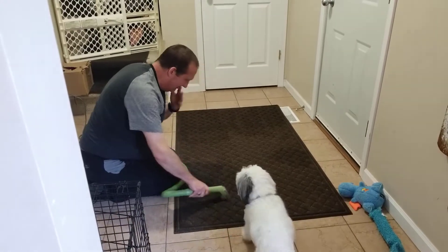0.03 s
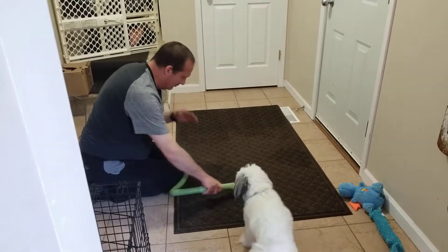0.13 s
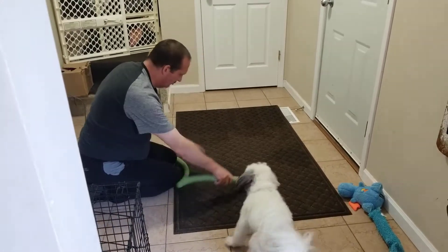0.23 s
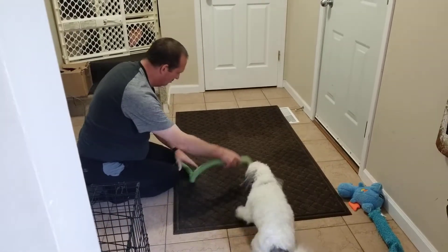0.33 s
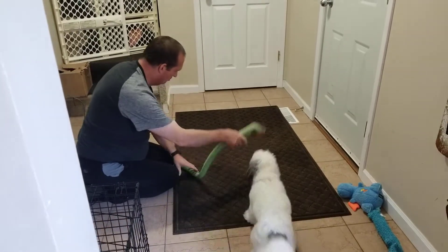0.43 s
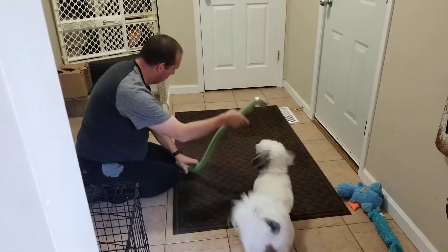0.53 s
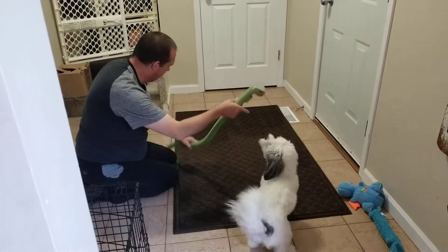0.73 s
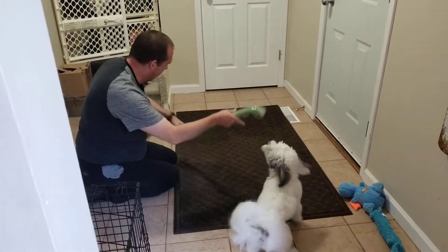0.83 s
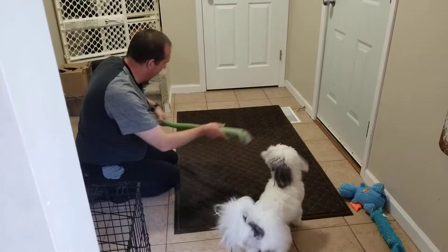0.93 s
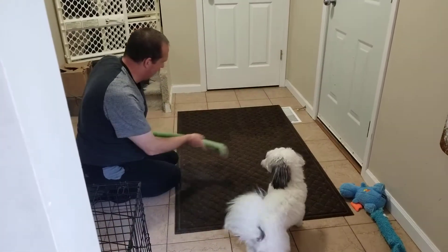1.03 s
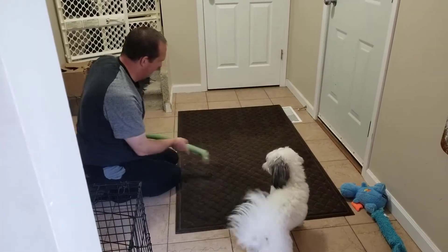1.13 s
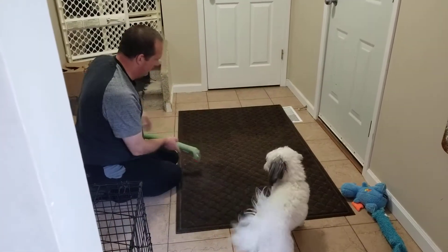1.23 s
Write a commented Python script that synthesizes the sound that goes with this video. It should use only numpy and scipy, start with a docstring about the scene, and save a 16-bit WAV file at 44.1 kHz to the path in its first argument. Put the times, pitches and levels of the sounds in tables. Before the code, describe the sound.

A small dog barks once, from about 0.2 to 0.35 seconds, a high rising yelp that breaks into a rasp and rings briefly in a hallway. Three very faint paw thuds land on a mat within the first 0.4 seconds. An appliance hums with softly rushing air throughout, dropping in level at the bark and staying quieter until the end, at around 1.3 seconds.

```python
"""A bark in a tiled hallway

An appliance's motor hums over rushing air, and paws thud softly on a mat. A small dog barks once:
its vocal folds slide up in a clear yelp, then break into a rasp, and walls and doors answer.
The recorder's gain control turns down at the bark and stays down, so the hum is quieter afterwards."""
import sys
import numpy as np
from scipy import signal
from scipy.fft import rfft, irfft, next_fast_len
from scipy.io import wavfile
from scipy.ndimage import uniform_filter1d, minimum_filter1d, map_coordinates

SR = 44100
rng = np.random.default_rng(int(sys.argv[2]) if len(sys.argv) > 2 else 0)


def bounce(signal):
    """Save signal as a 16-bit WAV file at the path given by the first command-line argument."""
    frames = np.transpose(np.atleast_2d(signal))
    limited = np.clip(frames, -1, 1)
    pcm = np.round(limited * 32767).astype(np.int16)
    wavfile.write(sys.argv[1], SR, pcm)


N = 57330
TIME = np.arange(N) / SR


def amp(db):
    """Turn decibels into a number to multiply by."""
    return 10 ** (np.asarray(db) / 20)


def unit(x):
    """Scale a sound to an average (rms) level of 1."""
    return x / np.sqrt(np.mean(x ** 2) + 1e-20)


def along(points, hz):
    """Read a table at any frequency, sliding between rows on a log scale."""
    freqs, values = np.transpose(points)
    return np.interp(np.log(hz + 1), np.log(freqs + 1), values)


def curves(rows):
    """Join timed rows with straight lines: one curve for each column after the time."""
    times, *columns = np.transpose(rows)
    return [np.interp(TIME, times, column) for column in columns]


def wobble(rate):
    """A smooth random curve through `rate` points a second."""
    return map_coordinates(rng.standard_normal(4096), [TIME * rate], mode="wrap")


def filtered(x, response):
    """Multiply each frequency in a sound by response(hz)."""
    size = next_fast_len(N + SR // 2)
    return irfft(rfft(x, size) * response(np.fft.rfftfreq(size, 1 / SR)), size)[..., :N]


def delayed(x, seconds):
    """The same sound, arriving later."""
    return filtered(x, lambda hz: np.exp(-2j * np.pi * hz * seconds))


def turning(hz):
    """The growing angle (phase) of a wave whose pitch follows hz."""
    return 2 * np.pi * np.cumsum(hz) / SR


# The motor's slight sag. Each row: time in seconds, pitch in Hz.
MOTOR_PITCH = [(0, 442.1), (.3, 435.3), (.75, 436.2), (1.3, 435.7)]
# The tones in the hum. Each row: multiple of the motor's pitch, level in dB.
HUM_TONES = [(.395, -53), (1, -32), (1.321, -39.5), (1.432, -44.5), (2, -46.5), (4.675, -43.5),
             (4.82, -47.5), (6.988, -53.5), (11.99, -60.5)]
# The tone color of the rushing air. Each row: frequency in Hz, relative level in dB.
AIR_COLOR = [(20, -34), (45, -17), (90, -22), (140, -13), (170, -10.5), (200, -9.5), (270, -14), (400, -12),
             (530, -8), (620, 1.5), (700, -5), (900, -10), (1500, -8), (1900, -6.5), (2060, -7),
             (2200, -11.5), (2550, -9), (2800, -17.5), (3300, -21), (4000, -21), (5700, -27), (8200, -41),
             (10000, -30.5), (12500, -31), (15700, -40)]
# The air's width. Each row: frequency in Hz, how alike left and right are (1 same, -1 opposite).
AIR_LIKENESS = [(50, 0.84), (170, 1), (400, 0.54), (700, 0.6), (1200, -0.11), (1600, -0.61), (2200, .35),
                (3200, -0.19), (8000, 0.0092)]

def appliance(waver_db=1.42, air_db=-28.5):
    """A motor hums, wavering a little, while air rushes through the appliance."""
    phase = turning(curves(MOTOR_PITCH)[0])
    hum = 0
    for ratio, db in HUM_TONES:
        strength = np.sqrt(2) * amp(db + waver_db * wobble(18))
        offset = rng.uniform(0, 2 * np.pi) + 0.21 * ratio * wobble(14)
        hum += strength * np.sin(ratio * phase + offset)

    def air_shape(hz):
        spread = np.arccos(np.clip(along(AIR_LIKENESS, hz), -1, 1)) / 2
        return amp(along(AIR_COLOR, hz)) * [np.cos(spread), np.sin(spread)]

    shared, opposite = filtered(rng.standard_normal((2, N)), air_shape)
    air = unit(np.array([shared + opposite, shared - opposite]))
    return hum + amp(air_db) * air


# Steps on the mat. Each row: start in seconds, relative level in dB.
PAW_STEPS = [(0.019, -41.5), (0.206, -40), (0.358, -40)]

def paws(pitch_hz=170.2, rise_s=0.0082, ring_s=0.065):
    """Each step gives the floor a short, dull ring."""
    floor = np.zeros(N)
    for start, db in PAW_STEPS:
        age = np.maximum(TIME - start, 0)
        strength = amp(db - 60 * age / ring_s) * (1 - np.exp(-age / rise_s))
        floor += strength * np.sin(2 * np.pi * pitch_hz * age)
    return 2 * floor


# The course of the bark. Each row: time in seconds, pitch in Hz, lowest tone's level in dB,
# overtones' level in dB before the throat shapes them, rasp's level in dB.
BARK_SHAPE = [(.204, 565.1, -54, -49.5, -48), (.213, 634.2, -31, -23.5, -43.5),
              (.223, 730.2, -15, -17, -26.5), (0.235, 763.2, -16, -12, -19), (.244, 837.2, -4, -14, -19.5),
              (0.26, 871.4, -9, -31, -13), (.274, 863.8, -10, 0, -8), (0.291, 843, -11, -5, -5),
              (0.314, 857.5, -18.5, -16, -6.5), (0.338, 851, -2, -25.5, -7.5), (0.351, 795, -62, -32, -27)]
# How throat and mouth shape the overtones. Each row: frequency in Hz, boost or cut in dB.
THROAT_COLOR = [(600, 2), (1150, 0.5), (1650, -2.5), (2000, -6.5), (2300, -11), (2600, -20.5), (2850, 1),
                (3050, -6), (3300, -28.5), (3900, -18), (4600, -60), (8000, -53)]
# The tone color of the rasp. Each row: frequency in Hz, relative level in dB.
RASP_COLOR = [(250, -54), (480, -32.5), (680, -8.5), (930, 0.5), (1120, -1), (1350, -12.5), (1550, -2.5),
              (1760, -0.5), (2020, -14), (2480, -7), (2950, -13.5), (3500, -29.5), (4500, -44), (6200, -39),
              (8200, -49), (11000, -44), (15500, -58)]

def bark(rough_start_s=0.255, roughen_s=0.027, shakes_per_s=500, second_hz=1121, close_db_per_s=1208):
    """Vocal folds glide up cleanly, then shake, add a second tone and chop the air into a rasp."""
    pitch, lowest_db, overtone_db, rasp_db = curves(BARK_SHAPE)
    roughness = np.clip((TIME - rough_start_s) / roughen_s, 0, 1)
    shake = (0.0098 + 0.042 * roughness) * wobble(shakes_per_s)
    phase = turning(pitch * (1 + shake))
    overtones = sum(amp(along(THROAT_COLOR, k * pitch)) * np.sin(k * phase) for k in range(2, 7))
    # Near 0.3 seconds the folds briefly vibrate at a second pitch too.
    swell = amp(-6.5) * np.exp(-0.5 * ((TIME - 0.3007) / 0.0086) ** 2)
    second_tone = swell * np.sin(turning(second_hz * (1 + 0.0371 * wobble(shakes_per_s))))
    voice = np.sqrt(2) * (amp(lowest_db) * np.sin(phase) + amp(overtone_db) * overtones + second_tone)
    puffs = rng.standard_normal(N) * (1 + np.cos(phase))
    rasp = amp(rasp_db) * unit(filtered(puffs, lambda hz: amp(along(RASP_COLOR, hz))))
    # The throat is closed before and after the bark.
    outside_s = np.abs(TIME - np.clip(TIME, BARK_SHAPE[0][0], BARK_SHAPE[-1][0]))
    return (voice + rasp) * amp(-close_db_per_s * outside_s)


# Which side the bark favors. Each row: frequency in Hz, how much louder the left is in dB.
BARK_BALANCE = [(700, -3), (1600, -2), (2600, 0.5), (5000, 1)]
# The first echoes. Each row: delay in seconds, strength, the left side's head start in seconds.
WALL_ECHOES = [(.0035, 0.32, -.0004), (0.0109, 0.23, .0003), (0.0205, 0.17, -.0003)]
# How long the hallway rings. Each row: frequency in Hz, seconds to fade by 60 dB.
RING_TIMES = [(200, 0.52), (900, 0.35), (2500, 0.34), (5000, 0.28), (12000, 0.31)]

def hallway(sound, right_lead_s=0.000082, ring_db=-1.5, ring_delay_s=0.008, build_s=0.004):
    """Sound arrives directly, then off three near surfaces, then as a short blur of echoes."""
    sides = np.array([[1], [-1]])  # left, right
    arriving = delayed(sound, sides * right_lead_s / 2)
    direct = filtered(arriving, lambda hz: amp(sides * along(BARK_BALANCE, hz) / 2))
    echoes = sum(gain * delayed(sound, delay - sides * lead / 2) for delay, gain, lead in WALL_ECHOES)
    # Fading noise stands for the many later echoes.
    hz, age, noise = signal.stft(rng.standard_normal((2, SR * 3 // 4)), SR, nperseg=256)
    fade = amp(-60 * age / along(RING_TIMES, hz)[:, None]) * (1 - np.exp(-age / build_s))
    tail = signal.istft(noise * fade, SR, nperseg=256)[1]
    ring = signal.fftconvolve(sound[None], tail / np.linalg.norm(tail[0]), axes=1)[:, :N]
    return direct + echoes + amp(ring_db) * delayed(ring, ring_delay_s)


def gain_control(sound, threshold_db=-9.5, range_db=11.5, react_s=0.025, sink_db_per_s=0.88):
    """A loud sound turns the volume down for good; the volume also sinks slowly throughout."""
    power = uniform_filter1d(np.mean(sound ** 2, axis=0), size=220)
    level_db = 10 * np.log10(np.abs(power) + 1e-12)
    excess_db = np.clip(level_db - threshold_db, 0, range_db)
    sink_db = sink_db_per_s * TIME
    cut_db = np.maximum.accumulate(excess_db - sink_db) + sink_db
    smoothing = np.exp(-1 / (react_s * SR))
    return sound * amp(-signal.lfilter([1 - smoothing], [1, -smoothing], cut_db))


def limiter(sound, ceiling=0.97, look_ahead_s=0.004):
    """See the highest peaks coming and ease them under the ceiling."""
    size = int(2 * look_ahead_s * SR)
    allowed = np.minimum(1, ceiling / (np.abs(sound).max(axis=0) + 1e-9))
    gain = minimum_filter1d(allowed, 2 * size)
    return sound * uniform_filter1d(uniform_filter1d(gain, size), size)


def scene():
    """The echoing bark and the paws over the steady appliance."""
    return hallway(bark()) + paws() + appliance()


def record(dry):
    """The recorder turns itself down, tames peaks and drops the very highest treble."""
    return filtered(limiter(gain_control(dry)), lambda hz: hz < 15780)


dry = scene()
out = record(dry)
bounce(out)
```